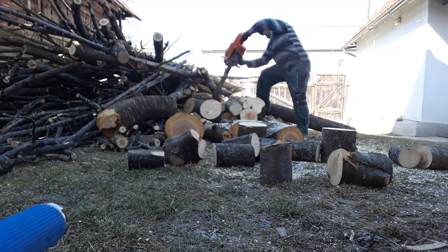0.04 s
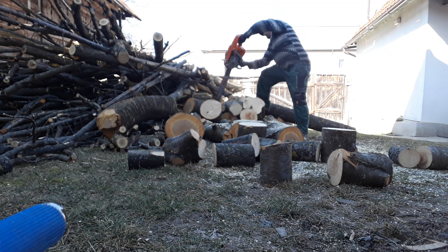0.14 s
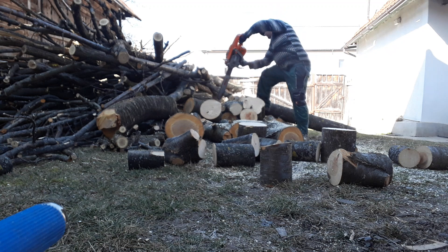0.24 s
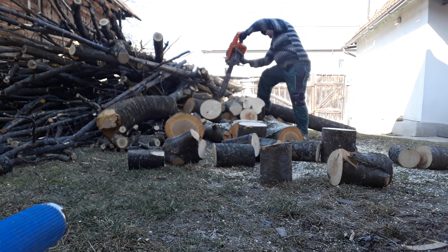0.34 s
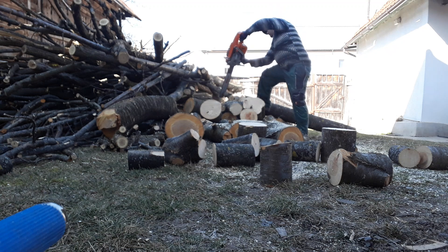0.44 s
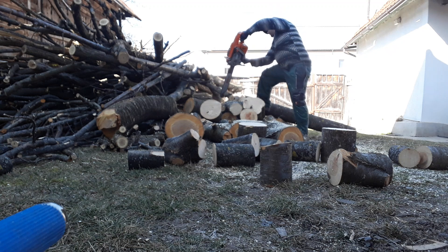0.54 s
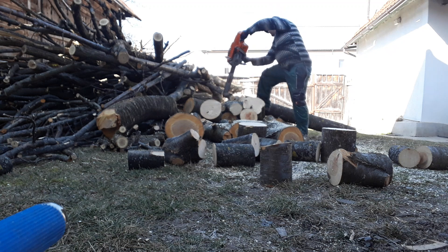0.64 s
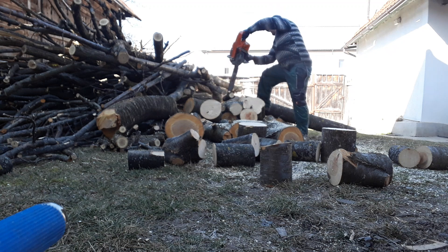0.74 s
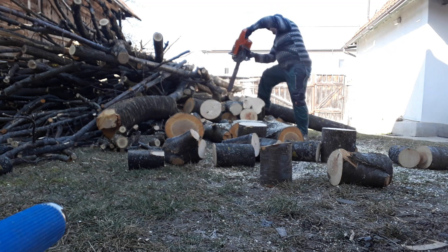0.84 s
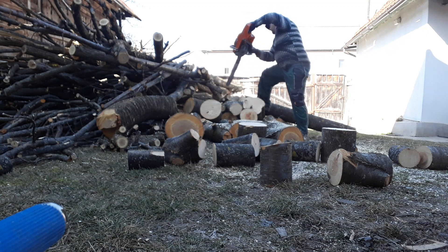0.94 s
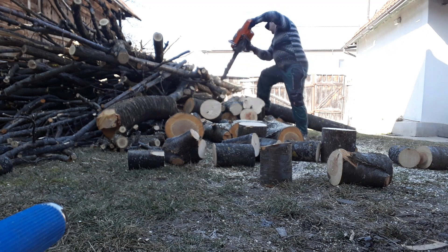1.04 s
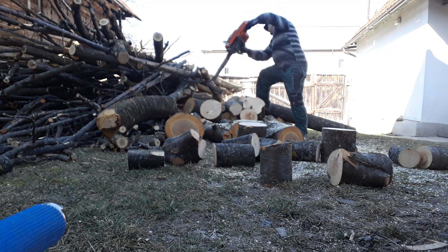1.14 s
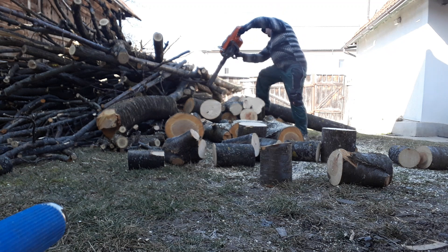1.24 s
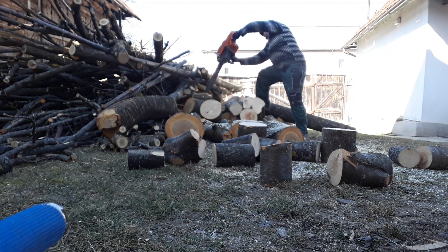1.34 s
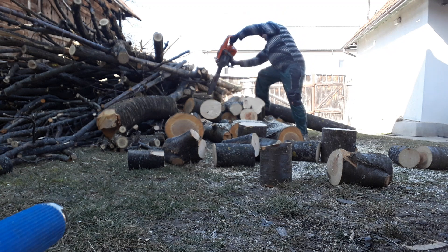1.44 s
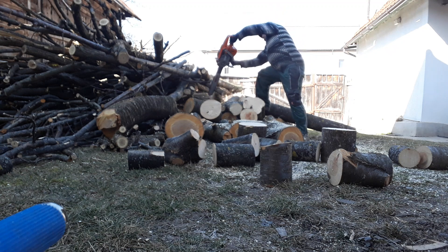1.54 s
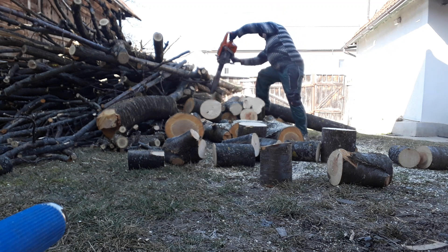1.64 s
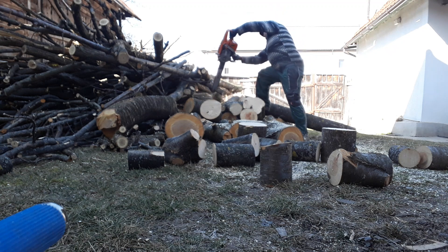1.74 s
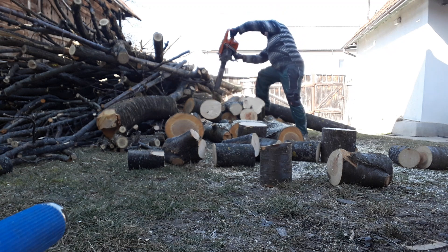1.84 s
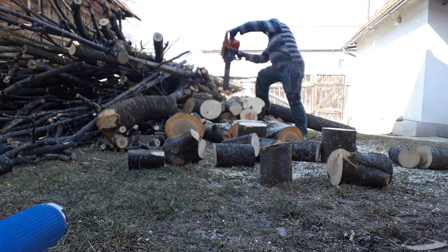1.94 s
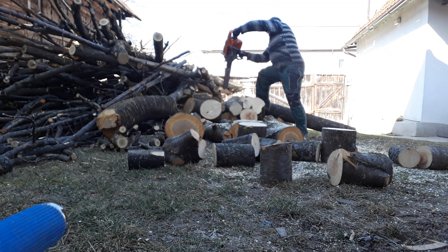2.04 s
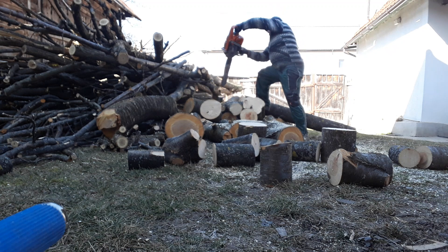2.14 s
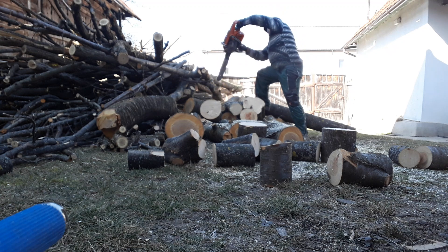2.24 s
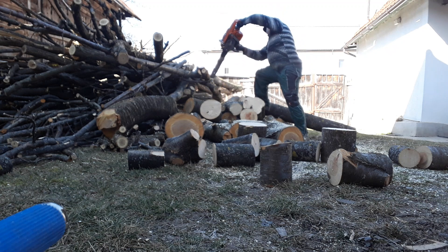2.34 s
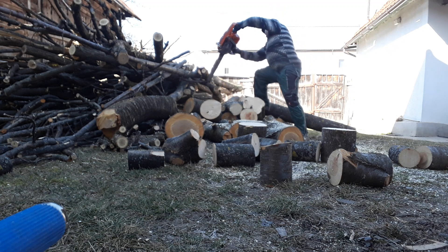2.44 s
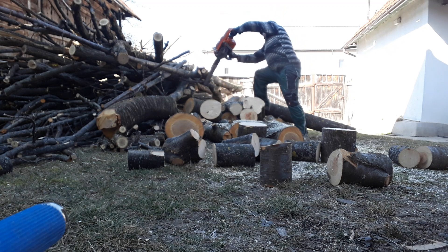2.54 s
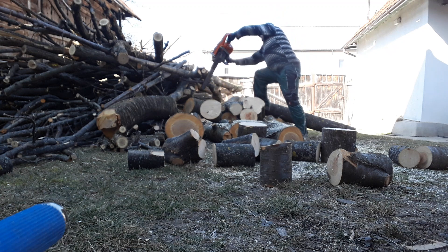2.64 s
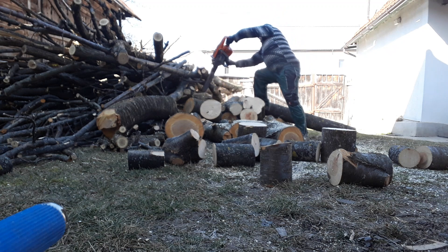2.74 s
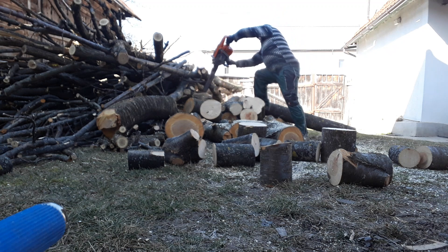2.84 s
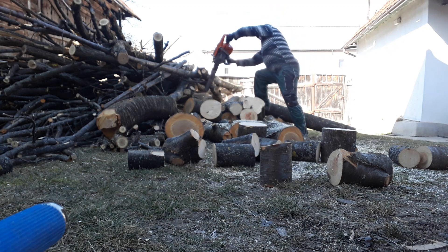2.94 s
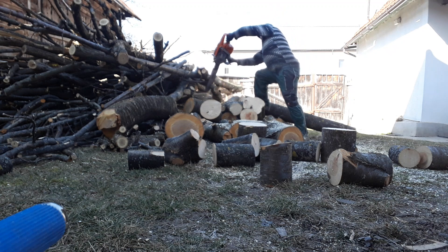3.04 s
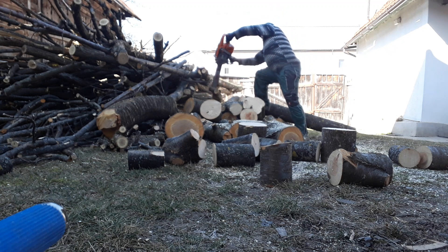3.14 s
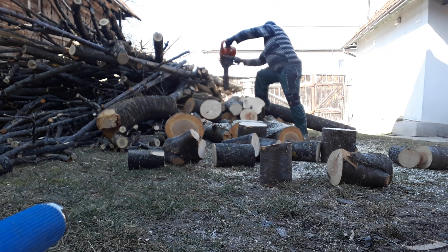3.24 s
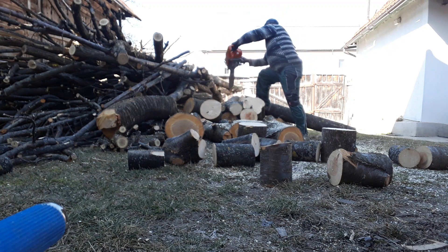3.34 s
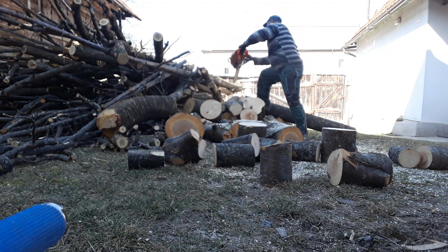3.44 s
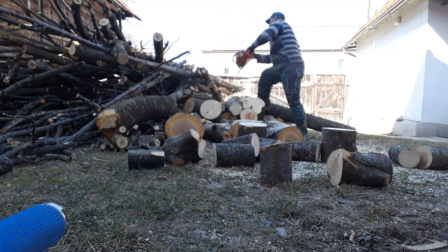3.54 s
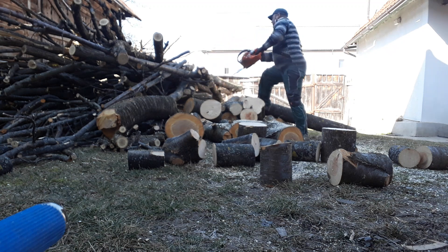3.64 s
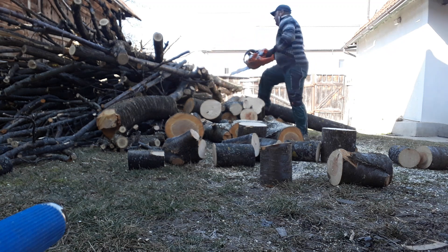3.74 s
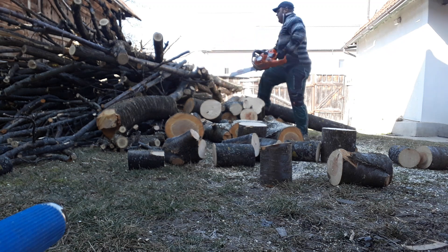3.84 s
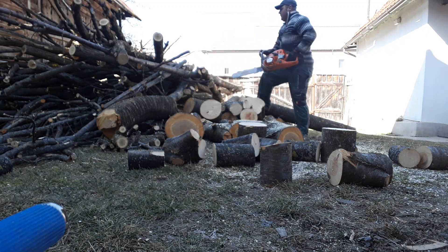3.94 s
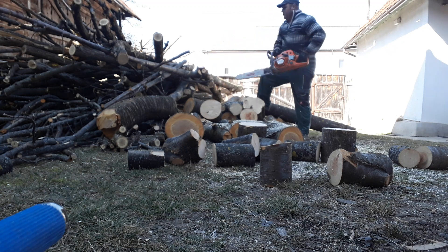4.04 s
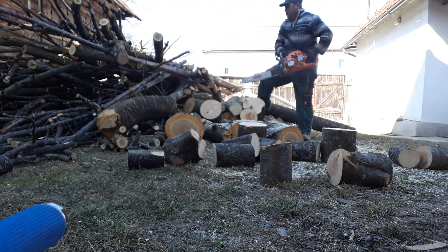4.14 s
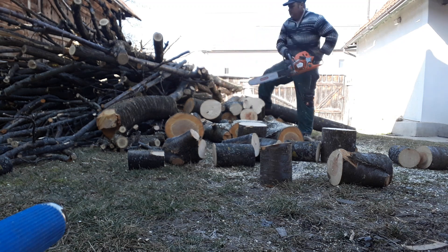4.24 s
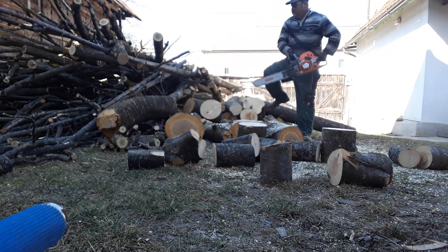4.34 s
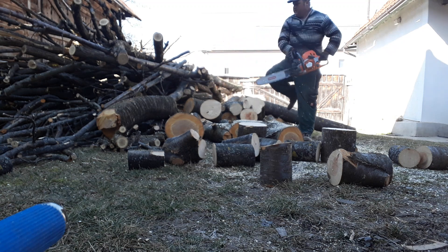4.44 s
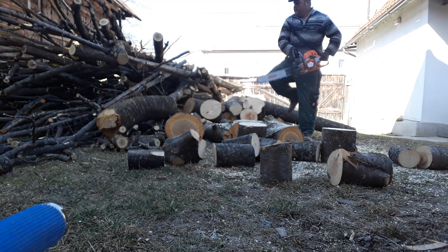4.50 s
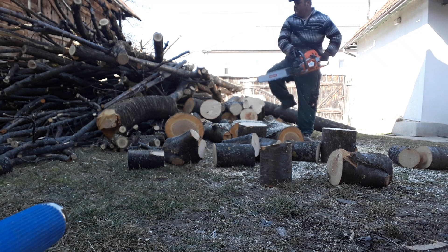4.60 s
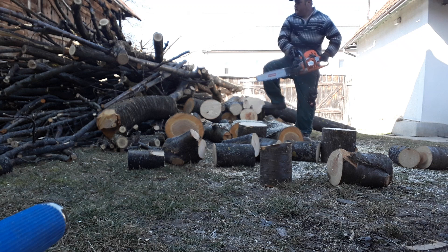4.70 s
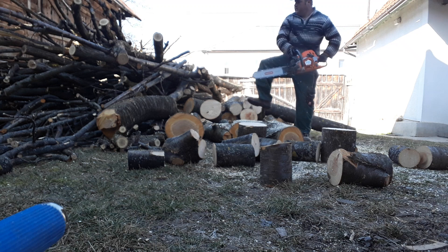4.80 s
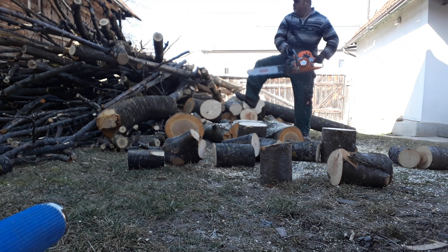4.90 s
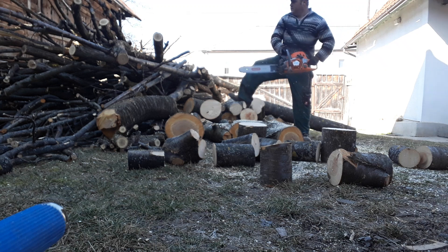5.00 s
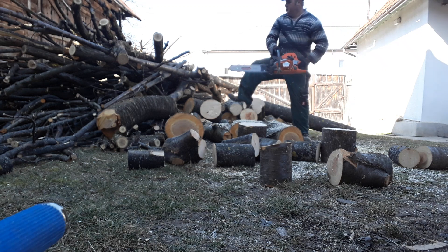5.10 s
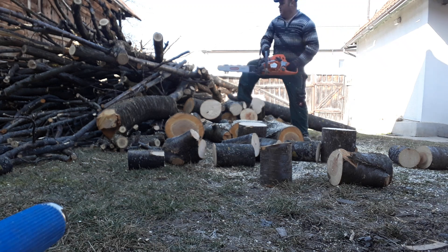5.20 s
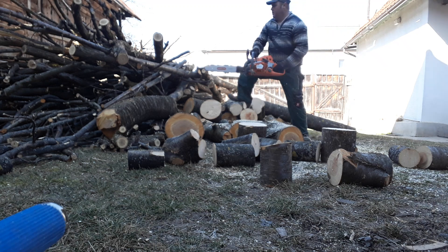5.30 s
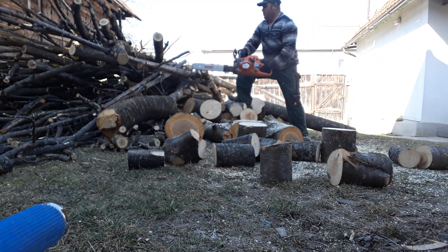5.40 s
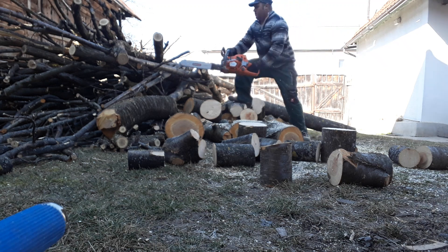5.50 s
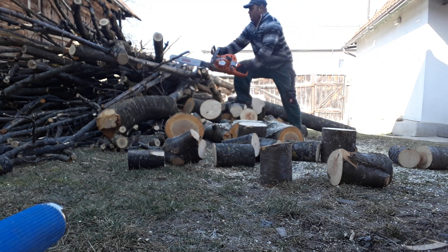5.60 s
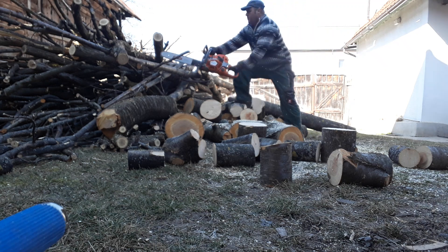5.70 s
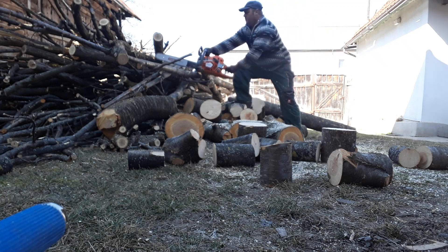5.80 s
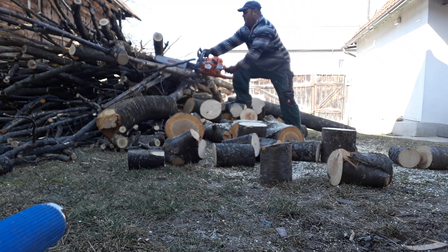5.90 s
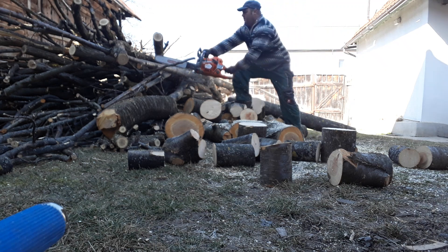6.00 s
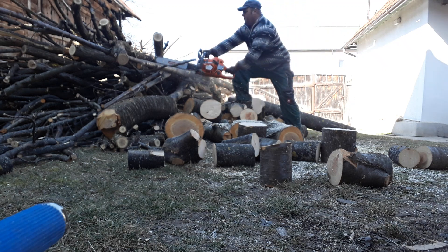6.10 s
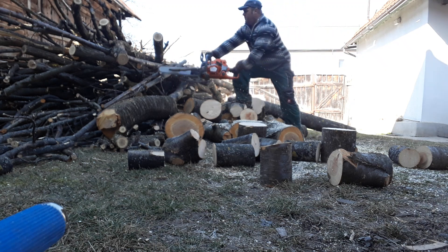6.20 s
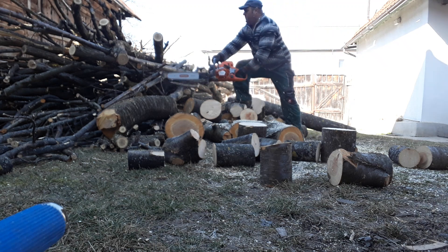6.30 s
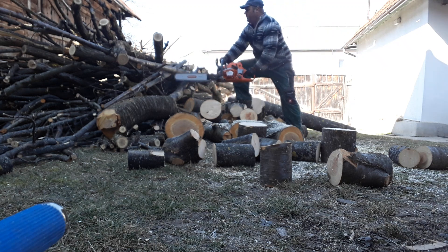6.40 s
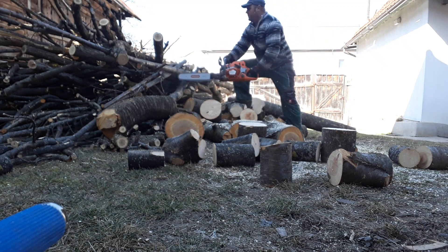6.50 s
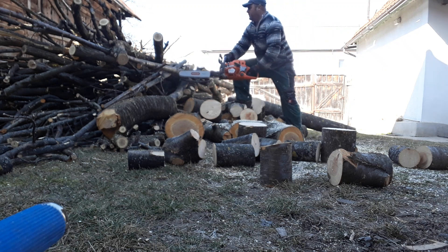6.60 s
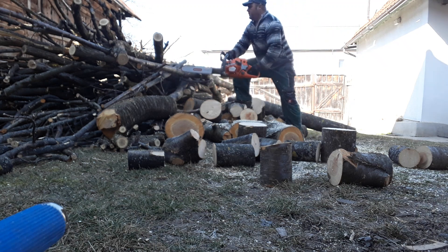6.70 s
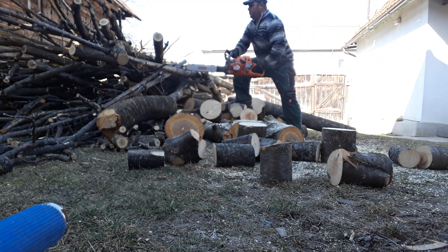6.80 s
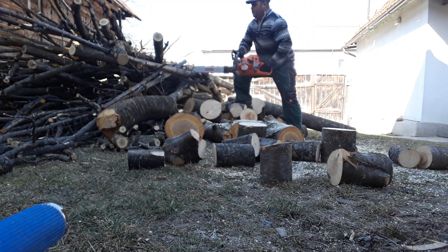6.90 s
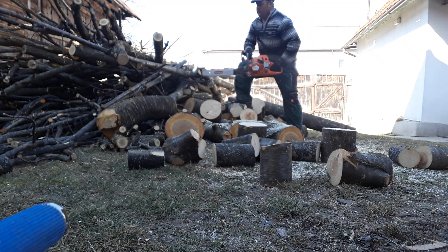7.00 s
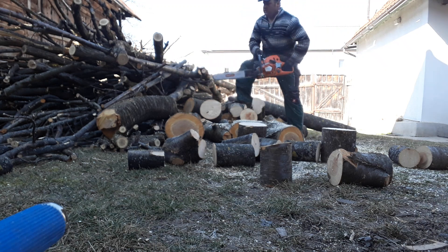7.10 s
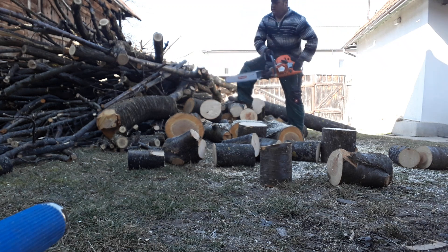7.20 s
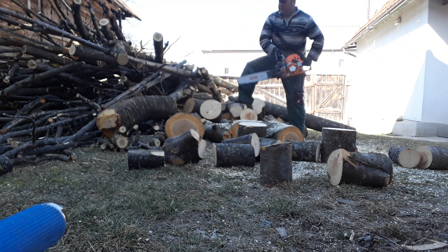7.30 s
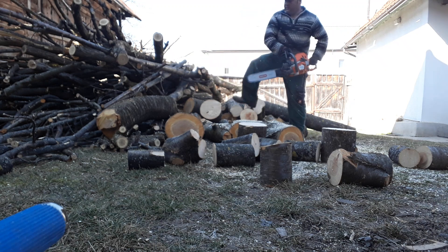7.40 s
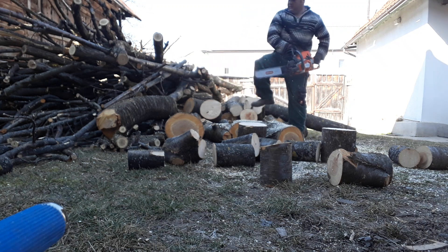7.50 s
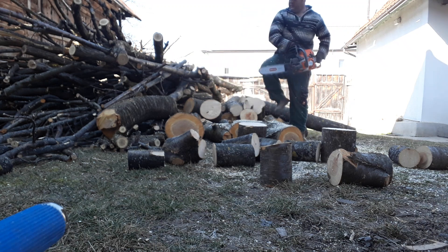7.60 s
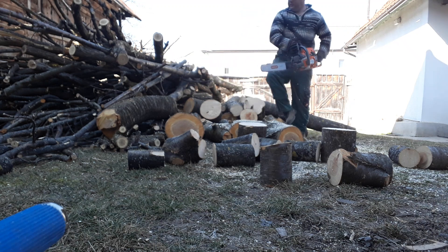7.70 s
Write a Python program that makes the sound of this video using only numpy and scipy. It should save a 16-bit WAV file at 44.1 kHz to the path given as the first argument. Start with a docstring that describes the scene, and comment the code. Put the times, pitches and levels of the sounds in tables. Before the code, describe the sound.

Outdoors, a two-stroke saw runs unloaded: barking exhaust, rushing gas hiss, chain clatter and metallic ringing all rise and fall with engine speed. Three quick throttle blips come first, then a slow loose idle with soft thumping pops, a strong sudden rev, another longer one, and a final run-down into sparse pops. Centred sound, fairly near, brief yard echo.

```python
"""A two-stroke chainsaw in a yard, already running down, is revved three times in quick succession.
It then falls back to a popping idle, is revved twice more, and runs down to popping again.
Throughout, the crank's speed and the throttle set the strength of exhaust pulses, gas hiss, clatter,
the ringing chain, fan whine and airbox drone; each pull drives the crank up, and friction slows it.
Woodpile and house wall answer with a short scattered echo; both channels are alike."""
import sys
import numpy as np
from scipy.fft import rfft, irfft, next_fast_len
from scipy.io import wavfile
from scipy.ndimage import uniform_filter1d, map_coordinates

SR = 44100
rng = np.random.default_rng(int(sys.argv[2]) if len(sys.argv) > 2 else 0)


def unload_audio(sound):
    """Save the sound as a 16-bit wav file, at the path given as the first command line argument."""
    columns = np.transpose(np.atleast_2d(sound))
    # keep every value between -1 and 1, then stretch to whole-number steps
    steps = np.round(np.clip(columns, -1, 1) * 32767)
    wavfile.write(sys.argv[1], SR, steps.astype(np.int16))


N = 341775
TIME = np.arange(N) / SR
GRID = next_fast_len(N + SR // 2, True)
FREQS = np.fft.rfftfreq(GRID, 1 / SR)
TOP_HZ = 15780  # band limit

START_HZ, START_RUNDOWN_PER_S = 168.97, 1.28  # the saw is already running down at the start
IDLE_HZ, IDLE_SAG_PER_S = 68.03, 0.55  # below this speed idle firings slow the run-down
REF_HZ = 200  # crank speed at which the loudness laws are stated
GASP_S = 0.093  # the opening gasp peaks this long after the pull
FIRST_SHUT_DB, SECOND_OPEN_DB, SECOND_SHUT_DB = -16, -17.5, -19.5  # added to the boom curve
GROUND_ECHO_S, GROUND_SWAY_S, GROUND_DB = 0.003, 0.0003, -7

# Trigger pulls; the saw is held differently for each, which changes what reaches the listener:
# [opens t/s, shuts t/s, shutting time t/s, run-down rate/(1/s), opening gasp level/dB, then relative
# levels: bark/dB, hiss/dB, clatter/dB, bar ring/dB, whine and blare/dB, airbox/dB]
PULLS = [(0.158, 0.687, 0.065, 1.315, 1, -2, -3, 0.5, 0.5, -3.5, 7),
         (1.454, 1.99, 0.046, 1.37, -1, -3, -3, 1.5, -4, -8, 6),
         (2.72, 3.304, 0.087, 1.45, 1.5, -2, -0.5, 0, -4.5, -7.5, 3),
         (4.888, 5.227, 0.072, 1.25, 10.5, 2.5, -6, 2.5, 8, -4, 7),
         (5.805, 6.349, .17, 1.385, 3.5, -3, -4.5, -0.5, 5.5, -3.5, 2)]
# The crank's climb during each pull: [t/s, turns a second f/Hz]
CRANK_CLIMBS = [
    [(0.15, 137.3), (0.198, 152.5), (0.27, 167.0), (0.412, 185.4), (0.512, 202.2), (0.68, 215.7)],
    [(1.43, 79.6), (1.466, 98.6), (1.502, 115.7), (1.598, 141.8), (1.826, 169.9), (2.02, 210.6)],
    [(2.69, 85.2), (2.814, 133), (3.018, 163.3), (3.152, 174.7), (3.248, 209.3), (3.32, 220.5)],
    [(4.87, 48.45), (4.98, 95.85), (5.03, 125.5), (5.088, 157), (5.164, 195.5), (5.22, 211.2)],
    [(5.79, 100.9), (5.866, 132.8), (5.924, 159.4), (6.06, 191.1), (6.258, 229.5), (6.33, 237.1)],
]
# Gain of the muffler on exhaust pulses: [f/Hz, relative level/dB]
MUFFLER_GAIN = [(30, -58), (55, -36), (90, 1), (200, 11), (330, 5), (440, -4), (590, 4.5), (700, 2.5),
                (820, 10), (1020, -1.5), (1300, 3), (1700, -11.5), (3200, -8), (6000, -19), (16000, -17.5)]
# Spectrum of the rushing gas: [f/Hz, relative level/dB]
GAS_SPECTRUM = [(100, -23.5), (480, -7), (1100, 0), (2200, -13), (4500, -5), (9000, 1.5), (13000, -4),
                (15500, 3)]
# Spectrum of struck metal: [f/Hz, relative level/dB]
METAL_SPECTRUM = [(100, -17.5), (300, -15), (450, -3.5), (600, -2.5), (800, -11.5), (1100, 0), (1600, -8.5),
                  (1950, -9), (2300, -8.5), (4500, -5), (9000, -5), (11000, -4.5), (15500, -17.5)]
# Resonances of the saw's housing and bar: [f/Hz, width f/Hz, lift level/dB]
HOUSING_MODES = [(796, 53, 12.5), (1420, 200, 8.5), (1926, 254, 12.5), (2550, 310, 16), (3140, 330, 12.5),
                 (3814, 160, 7), (4330, 445, 10), (5034, 340, 7), (5740, 100, 8.5), (6215, 157, 10),
                 (6767, 260, 8.5), (8390, 780, 4), (9470, 360, 5), (11700, 390, 4.5), (13540, 720, 7)]
# Modes of the loose steel of clutch and chain: [f/Hz, width f/Hz, relative level/dB]
STEEL_MODES = [(1344, 48, -3.5), (1860, 73, -0.5), (2474, 43, 7.5), (3390, 130, 1.5), (4310, 91, -1.5),
               (4890, 42, -1), (5520, 110, -3.5), (6220, 150, -6), (8940, 520, -5), (11600, 510, -19)]
# Cooling fan: [crank order, relative level/dB]
FAN_ORDERS = [(12, -2), (18, 7), (20, 9.5), (22, -13)]
# How muffler and ground pass the piston's low orders: [f/Hz, level/dB]
BOOM_GAIN = [(50, -42), (105, -29.5), (142, -19), (158, -24), (180, -16.5), (198, -14), (220, -17),
             (240, -14), (310, -12), (450, -9)]
# Air intake: [crank order, relative level/dB]
INTAKE_ORDERS = [(3, -5.5), (4, -2.5), (5, -10)]
# Muffler resonances that a crank order sweeps through: [order, f/Hz, width f/Hz, relative level/dB]
BLARE_MODES = [(3, 587, 70, -32), (4, 791, 178, -14.5), (6, 1275, 140, -30)]
# Single firings at idle: [t/s, relative level/dB]
IDLE_FIRINGS = [(3.987, -19.5), (4.26, -19.5), (4.384, -21), (4.498, -14.5), (4.629, -19), (4.667, -19),
                (4.703, -24), (4.744, -21), (4.803, -26), (4.847, -14), (4.887, -15), (4.906, -9),
                (7.13, -33), (7.221, -32), (7.293, -21), (7.386, -24), (7.497, -20), (7.627, -18.5),
                (7.723, -19)]
# Spectrum of an idle firing's thump: [f/Hz, relative level/dB]
THUMP_SPECTRUM = [(40, -16), (110, 0.5), (250, 9), (450, -20.5), (600, 0.5), (850, 3.5), (1080, -30),
                  (1700, -29), (4000, -36), (9000, -25), (14000, -48)]

# Loudness laws, before each pull's own level is added:
# [open-throttle level/dB at REF_HZ, its slope/(dB per octave of speed),
#  shut-throttle level/dB at REF_HZ, its slope/(dB per octave of speed)]
# Exhaust bark: columns as above
BARK_LOUDNESS = (-19, 7.5, -28, 23)
# Gas blown through the muffler each turn: columns as above
PUTTER_LOUDNESS = (-37.5, -4.5, -43.5, -1)
# Gas hiss: columns as above
HISS_LOUDNESS = (-14.5, 6.5, -20, 9)
# Clatter of piston and chain: columns as above
CLATTER_LOUDNESS = (-17, 11.5, -17, 12.5)
# Jingle of loose steel: columns as above
JINGLE_LOUDNESS = (-31, 13, -41.5, -3.5)
# Ringing of the chain on the bar: columns as above
RING_LOUDNESS = (-32, 28, -26.5, 18.5)
# Airbox drone: columns as above
AIRBOX_LOUDNESS = (-44.5, -12.5, -52, -12)


def amp(db):
    """Logarithmic level: decibels to an amplitude ratio."""
    return 10 ** (np.asarray(db) / 20)


def unit(x):
    """Normalisation: scale to an rms of 1."""
    return x / np.sqrt(np.mean(x ** 2) + 1e-20)


def wobble(rate):
    """Random modulation: a smooth curve through `rate` random knots a second."""
    knots = rng.standard_normal(int(N * rate / SR) + 4)
    return map_coordinates(knots, [TIME * rate])


def along(points, at=FREQS):
    """Spectral envelope: points of frequency and level joined on a logarithmic axis."""
    hz, db = np.transpose(points)
    return np.interp(np.log(at + 1), np.log(hz), db)


def causal(db):
    """Minimum phase: the response with this gain that rings only after a blow."""
    cepstrum = irfft(np.log(amp(db)), GRID)
    return np.exp(rfft(2 * cepstrum[:GRID // 2], GRID) - cepstrum[0])


def resonance(hz, width):
    """Damped resonance: the response of one mode."""
    damping = 1j * FREQS * width
    return damping / (hz ** 2 - FREQS ** 2 + damping)


def filtered(x, response):
    """Linear filtering: the spectrum of x times a frequency response."""
    return irfft(rfft(x, GRID) * response, GRID)[:N]


def scattering(t60):
    """Diffuse decay: the response of many close modes or echoes dying together."""
    t = TIME[:SR // 2]
    tail = rng.standard_normal(len(t)) * amp(-60 * t / t60)
    return rfft(unit(tail) / np.sqrt(len(t)), GRID)


def pulses(times, sizes):
    """Band-limited impulses: windowed sincs that may fall between samples."""
    at = np.clip(times * SR, 8, N - 10)[:, None]
    taps = at.astype(int) + np.arange(-7, 9)
    shape = np.sinc(taps - at) * np.sinc((taps - at) / 8)
    return np.bincount(taps.ravel(), (sizes[:, None] * shape).ravel(), N)


def bursts(turns, length):
    """Periodic excitation: a spurt of noise each turn, decaying over this share of the turn."""
    return rng.standard_normal(N) * np.exp(-(turns % 1) / length)


def since_pop():
    """Event clock: seconds since the latest idle firing, and its gain (0 before the first)."""
    times, db = np.transpose(IDLE_FIRINGS)
    latest = np.maximum(np.searchsorted(times, TIME) - 1, 0)
    return np.abs(TIME - times[latest]), amp(db[latest]) * (TIME > times[0])


def run_down(age, top_hz, rate):
    """Exponential decay: friction takes a fixed share of speed each second, less once at idle."""
    to_idle = np.log(top_hz / IDLE_HZ) / rate
    friction = rate * np.clip(age, 0, to_idle)
    idle_sag = IDLE_SAG_PER_S * np.maximum(age - to_idle, 0)
    return top_hz * np.exp(-friction - idle_sag)


def crank():
    """Drive and friction: each pull speeds the crank up, then it runs down until the next."""
    speed = run_down(TIME, START_HZ, START_RUNDOWN_PER_S)
    for climb, (opens, shuts, shut_time, rate, *levels) in zip(CRANK_CLIMBS, PULLS):
        times, hz = np.transpose(climb)
        climbing = np.interp(TIME, times, hz)
        falling = run_down(TIME - times[-1], hz[-1], rate)
        rev = np.where(TIME < times[-1], climbing, falling)
        speed = np.where(TIME < times[0], speed, rev)
    return uniform_filter1d(speed, size=SR // 60)


def kicked(speed, kick=0.11, fade=0.09):
    """Impulsive drive: each idle firing speeds the crank up, and it sags again."""
    age, gain = since_pop()
    surge = uniform_filter1d(np.exp(-age / fade) * (gain > 0), size=SR // 80)
    local_mean = uniform_filter1d(surge, size=SR // 6)
    return speed * (1 + kick * (surge - local_mean))


def trigger():
    """Control: throttle opening 0-1, gasp in dB after each pull, the latest pull's part levels."""
    opens, shuts, shut_time, rate, gasp_db, *parts_db = np.transpose(PULLS)
    latest = np.maximum(np.searchsorted(opens, TIME) - 1, 0)
    closing = np.clip(0.5 + (shuts[latest] - TIME) / shut_time[latest], 0, 1)
    held = (TIME > opens[latest]) * closing
    age = np.maximum(TIME - opens[latest], 0) / GASP_S
    gasp = gasp_db[latest] * (age * np.exp(1 - age)) ** 2
    levels = [uniform_filter1d(db[latest], size=SR // 10) for db in parts_db]
    return uniform_filter1d(held, size=SR // 30), gasp, levels


def loudness(law, speed, throttle):
    """Power law: level is linear in octaves of speed, on one line open and another shut."""
    open_db, open_slope, shut_db, shut_slope = law
    octaves = np.log2(speed / REF_HZ)
    open_level = open_db + open_slope * octaves
    shut_level = shut_db + shut_slope * octaves
    return throttle * open_level + (1 - throttle) * shut_level


def housing():
    """Body resonance: the lift in dB that the saw's body gives each frequency."""
    return sum(db * np.exp(-((FREQS - hz) / width) ** 2) for hz, width, db in HOUSING_MODES)


def puffs(speed, turns, scatter, jitter):
    """Pulse train: one uneven puff a turn, less its mean and two lowest orders."""
    times = np.interp(np.arange(1, int(turns[-1])), turns, TIME)
    size_chance, time_chance = rng.standard_normal((2, len(times)))
    sizes = 1 + np.interp(times, TIME, scatter) * size_chance
    # jitter is a share of a turn
    shifts = jitter * time_chance / np.interp(times, TIME, speed)
    train = pulses(times + shifts, sizes)
    low = speed / SR * (1 + 2 * np.cos(2 * np.pi * turns) + 2 * np.cos(4 * np.pi * turns))
    return (train - low) / np.sqrt(speed)


def exhaust(speed, turns, throttle):
    """Source and filter: firings bark through the muffler and stumble at the top of each rev."""
    stumble = sum(np.exp(-((TIME - shuts) / 0.093) ** 2) for opens, shuts, *rest in PULLS)
    train = puffs(speed, turns, scatter=0.14 + 0.3 * stumble, jitter=0.005)
    # under load at low speed the gas leaves in ragged gusts
    load = throttle * np.clip(120 / speed, 0, 1) ** 3
    gusts = bursts(turns, length=0.86) * load
    muffler = causal(along(MUFFLER_GAIN))
    bark = unit(filtered(train, muffler)) + amp(-12) * unit(filtered(gusts, muffler))
    return bark + amp(-9) * filtered(bark, scattering(t60=0.12))


def swaying(x):
    """Interference: as the saw moves, its ground echo's delay drifts and harmonics swell and fade."""
    delay = GROUND_ECHO_S + GROUND_SWAY_S * wobble(5)
    return x + amp(GROUND_DB) * np.interp(TIME - delay, TIME, x)


def putter(turns):
    """Cavity resonance: each turn blows a little gas through the muffler's chambers, fired or not."""
    chambers = resonance(hz=660, width=150) ** 2 + 1.2 * resonance(hz=820, width=150) ** 2
    return unit(filtered(bursts(turns, length=0.5), chambers))


def hiss(turns, throttle, body_db):
    """Turbulence: gas rushes out as the port opens each turn, in sharper spurts under throttle."""
    spurt = np.exp(-(turns % 1) / 0.35)
    flow = (1 + (0.7 + 0.6 * throttle) * spurt) / (1.23 + 0.2 * throttle)
    noise = flow * rng.standard_normal(N) * amp(1.8 * wobble(110))
    return unit(filtered(noise, causal(along(GAS_SPECTRUM) + body_db)))


def clatter(speed, turns, body_db, count=7):
    """Impact: piston and links strike at set crank angles; slack chain rattles after each jerk."""
    angles = (np.arange(count) + rng.uniform(-0.294, 0.294, count)) / count
    strikes = np.arange(int(turns[-1]))[:, None] + angles
    time_chance, size_chance = rng.standard_normal((2, len(strikes), count))
    times = np.interp(strikes, turns, TIME) + 2.5e-5 * time_chance
    sizes = amp(rng.standard_normal(count) + 0.66 * size_chance)
    blows = pulses(times.ravel(), sizes.ravel()) / np.sqrt(speed)
    knocks = unit(filtered(blows, scattering(t60=0.05)))
    # the slower the crank, the harder each turn jerks the chain
    slack = np.clip(62 / speed, 0, 1) ** 2
    strength = amp(2.5 * rng.standard_normal(2000))[turns.astype(int)]
    jerk = 1 + 2 * slack * strength * np.exp(-(turns % 1) / 0.3)
    jerk = jerk / uniform_filter1d(jerk, size=SR // 10)
    rattle = unit(rng.standard_normal(N) * amp(1.15 * wobble(90) + 0.22 * wobble(580)))
    struck = jerk * (knocks + amp(-3) * rattle)
    return unit(filtered(struck, causal(along(METAL_SPECTRUM) + body_db)))


def jingle(turns):
    """Modal excitation: each turn shakes the loose steel; it stands out at idle."""
    # alternate signs
    steel = sum((-1) ** k * amp(db) * resonance(hz, width)
                for k, (hz, width, db) in enumerate(STEEL_MODES))
    return unit(filtered(bursts(turns, length=0.4), steel))


def chain_ring(turns):
    """Friction-driven resonance: links on the bar keep steel ringing in uneven bursts."""
    once_a_turn = 1 + 0.5 * np.cos(2 * np.pi * turns)
    rubbing = rng.standard_normal(N) * amp(2.7 * wobble(45)) * once_a_turn
    return unit(filtered(rubbing, resonance(hz=4473, width=300) ** 2))


def fan(speed, turns):
    """Blade passing: vanes whine with speed and scream where orders cross the cover's resonance."""
    whine = 0
    for order, db in FAN_ORDERS:
        level = amp(db + 2.5 * wobble(40))
        whine = whine + level * np.sin(2 * np.pi * order * turns + 0.5 * wobble(150))
    cover = 0.02 + resonance(hz=4400, width=1000) ** 2
    return amp(-23) * (speed / REF_HZ) ** 2 * filtered(whine, cover)


def hum(speed, turns, throttle, gasp_db):
    """Volume pumping: the piston gives two clean low orders that swell and dip as they sweep."""
    shut = 1 - throttle
    first_db = along(BOOM_GAIN, speed) + shut * FIRST_SHUT_DB + 0.82 * gasp_db
    second_offset_db = throttle * SECOND_OPEN_DB + shut * SECOND_SHUT_DB
    second_db = along(BOOM_GAIN, 2 * speed) + second_offset_db + 1.63 * gasp_db
    first_sway_db = (2.3 - 1.7 * throttle) * wobble(24)
    first = amp(first_db + first_sway_db) * np.cos(2 * np.pi * turns + np.pi / 2)
    second = amp(second_db + 2.5 * wobble(24)) * np.cos(4 * np.pi * turns)
    return np.sqrt(2) * (first + second)


def airbox(turns):
    """Forced cavity: intake gulps ring the airbox, a drone on a few orders when running slowly."""
    gulps = 0
    for order, db in INTAKE_ORDERS:
        level = amp(db + 2 * wobble(20))
        gulps = gulps + level * np.cos(2 * np.pi * order * turns + 0.25 * wobble(20))
    rush = 3 * rng.standard_normal(N)
    age, gain = since_pop()
    # each idle firing briefly weakens the drone
    choked = 1 - 0.7 * (gain > 0) * np.exp(-age / 0.015)
    return filtered(choked * (gulps + rush), resonance(hz=227, width=222) ** 2)


def yard(x, t60=0.2, wet_db=-10):
    """Reverberation: ground, logs and wall send back a short scattered echo."""
    return x + amp(wet_db) * filtered(x, scattering(t60))


def blare(turns, throttle):
    """Swept resonance: under throttle single orders pass the muffler's resonances and blare."""
    total = 0
    for order, hz, width, db in BLARE_MODES:
        phase = 2 * np.pi * order * turns + 0.2 * wobble(80)
        tone = throttle * amp(2 * wobble(30)) * np.cos(phase)
        total = total + amp(db) * filtered(tone, resonance(hz, width) ** 2)
    return total


def pops(body_db):
    """Impulse response: an idle firing thumps the muffler, rings around inside it and spits gas."""
    times, db = np.transpose(IDLE_FIRINGS)
    age, gain = since_pop()
    gas = gain * np.exp(-age / 0.013) * rng.standard_normal(N)
    blow = pulses(times, amp(db + 27)) + amp(5) * gas
    thump = filtered(blow, causal(along(THUMP_SPECTRUM)))
    return thump + amp(-7) * filtered(gas, causal(along(METAL_SPECTRUM) + body_db))


def scene():
    """Superposition: the crank's speed and the trigger play all parts of the saw."""
    speed = kicked(crank())
    turns = np.cumsum(speed) / SR
    throttle, gasp_db, part_levels = trigger()
    bark_db, hiss_db, clatter_db, ring_db, whine_db, airbox_db = part_levels
    body_db = housing()

    def gain(law, db):
        """Level addition: a part's loudness law plus its own level, as a gain."""
        return amp(loudness(law, speed, throttle) + db)

    bark = swaying(exhaust(speed, turns, throttle))
    saw = (gain(BARK_LOUDNESS, bark_db + 0.53 * gasp_db) * bark
           + gain(PUTTER_LOUDNESS, gasp_db) * putter(turns)
           + gain(HISS_LOUDNESS, hiss_db + 0.9 * gasp_db) * hiss(turns, throttle, body_db)
           + gain(CLATTER_LOUDNESS, clatter_db + 0.44 * gasp_db) * clatter(speed, turns, body_db)
           + gain(JINGLE_LOUDNESS, clatter_db) * jingle(turns)
           + gain(RING_LOUDNESS, ring_db) * chain_ring(turns)
           + pops(body_db))
    whines = amp(whine_db) * (fan(speed, turns) + blare(turns, throttle))
    tones = whines + hum(speed, turns, throttle, gasp_db)
    drone = gain(AIRBOX_LOUDNESS, airbox_db + gasp_db) * airbox(turns)
    mono = yard(saw) + tones + drone  # only the saw's noises get the echo
    return np.array([mono, mono])


def record(dry):
    """Saturation and band limiting: peaks are rounded, deep bass and the top band are cut."""
    rounded = dry / (1 + np.abs(dry / 0.9) ** 8) ** (1 / 8)
    low_cut = FREQS ** 3 / (FREQS ** 3 + 50 ** 3)
    band = low_cut * (FREQS < TOP_HZ)
    return np.array([filtered(channel, band) for channel in rounded])


dry = scene()
out = record(dry)
unload_audio(out)
```